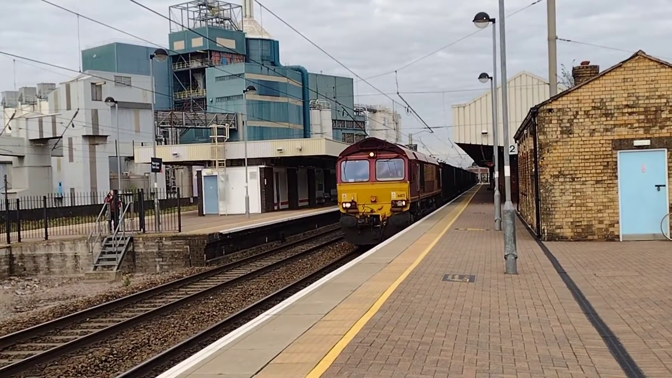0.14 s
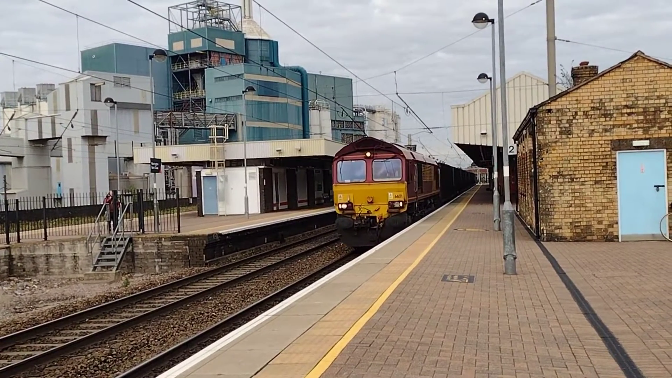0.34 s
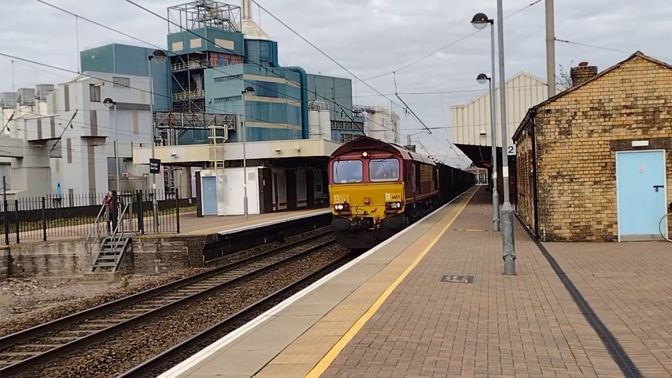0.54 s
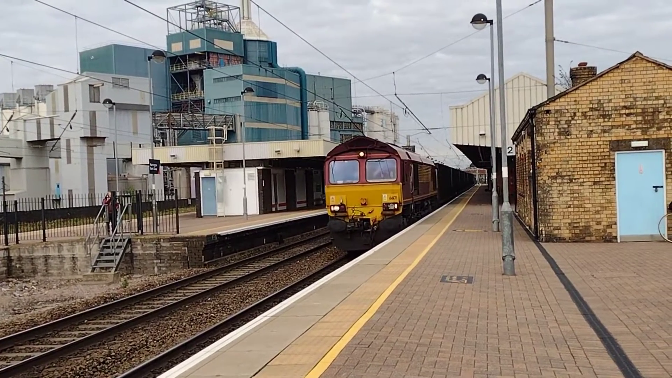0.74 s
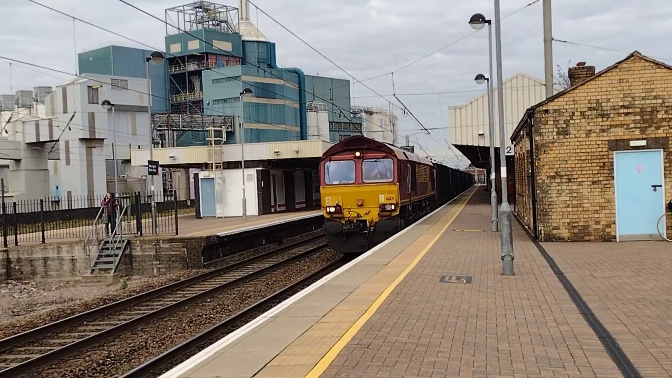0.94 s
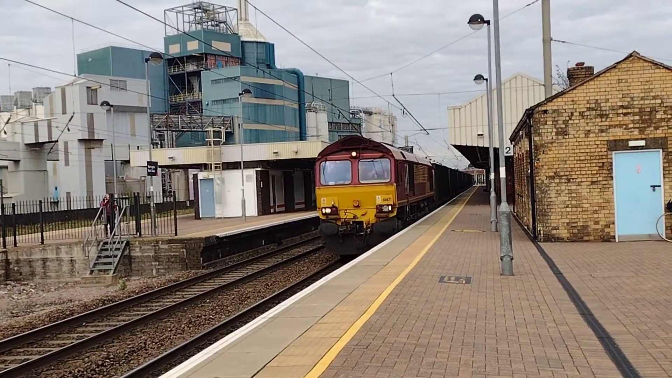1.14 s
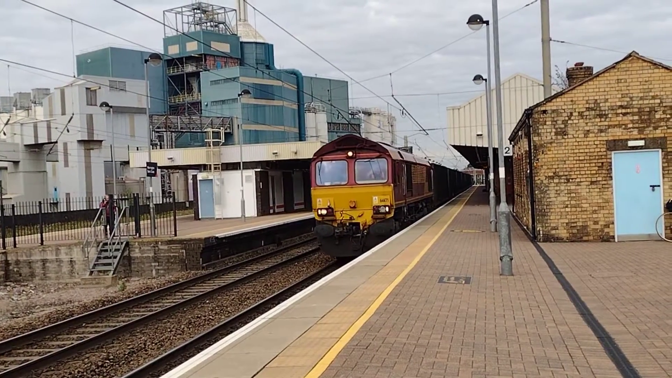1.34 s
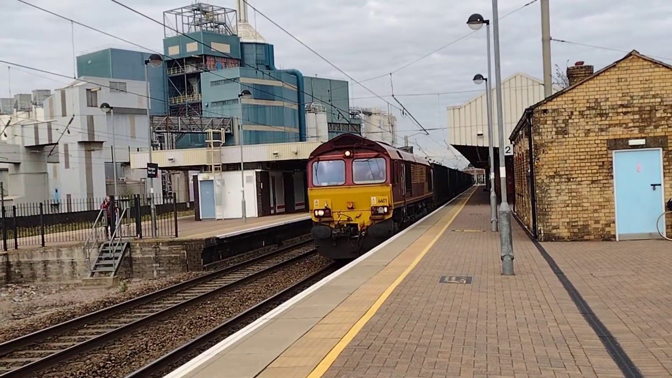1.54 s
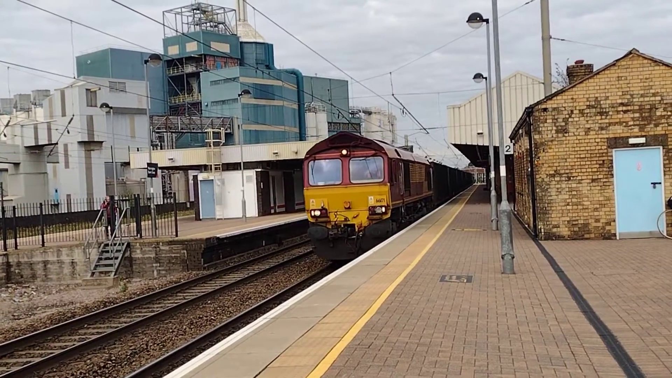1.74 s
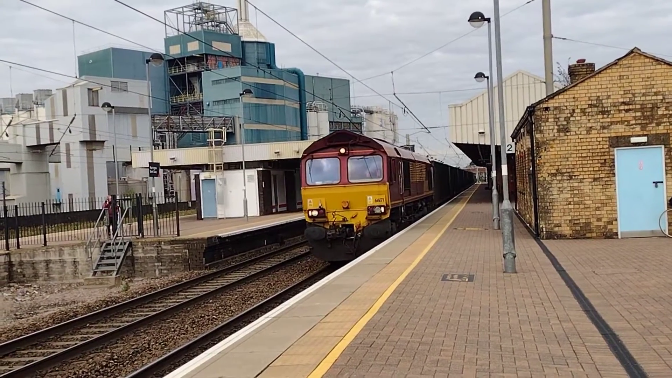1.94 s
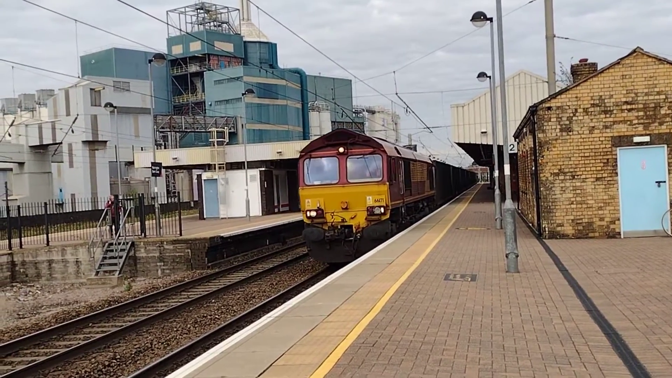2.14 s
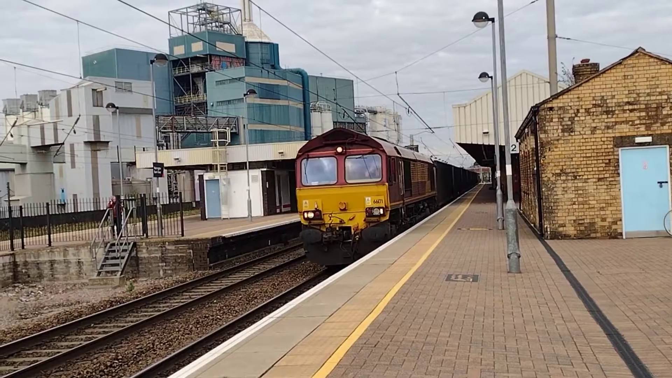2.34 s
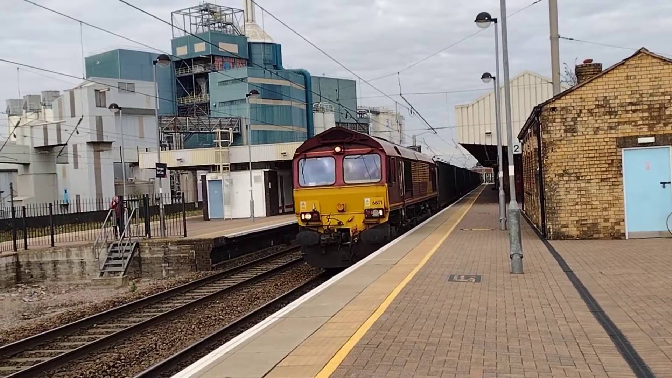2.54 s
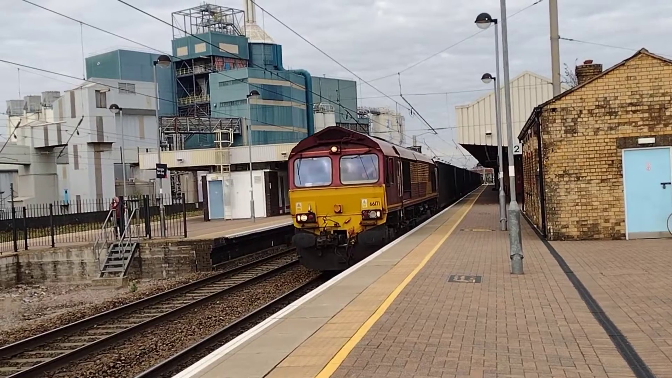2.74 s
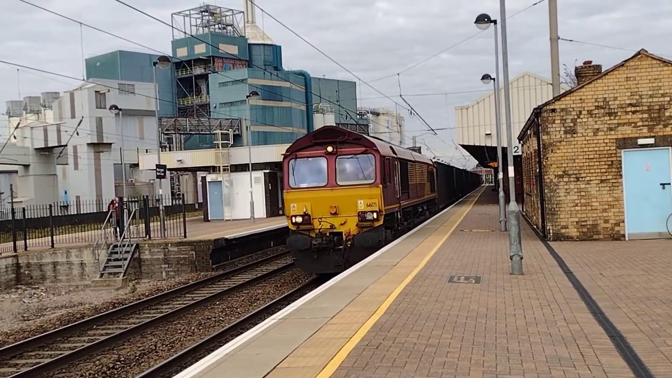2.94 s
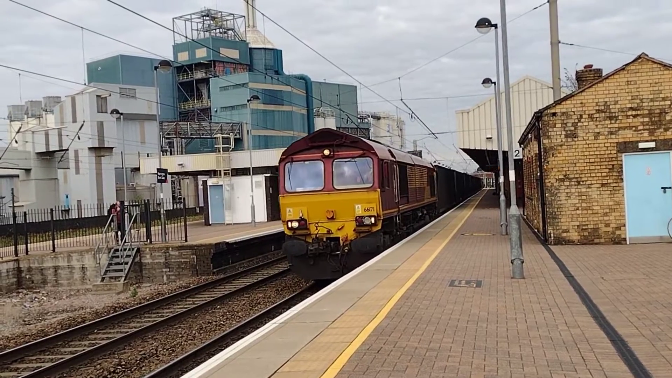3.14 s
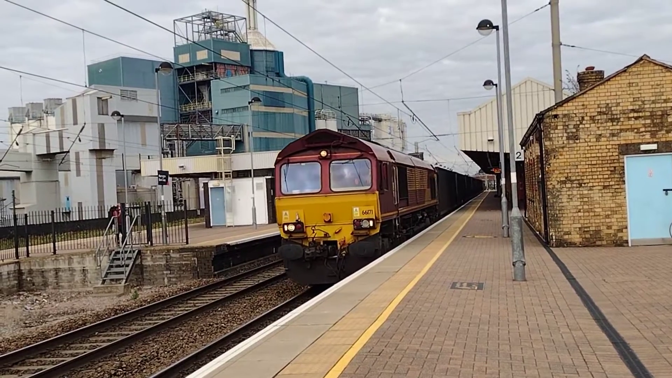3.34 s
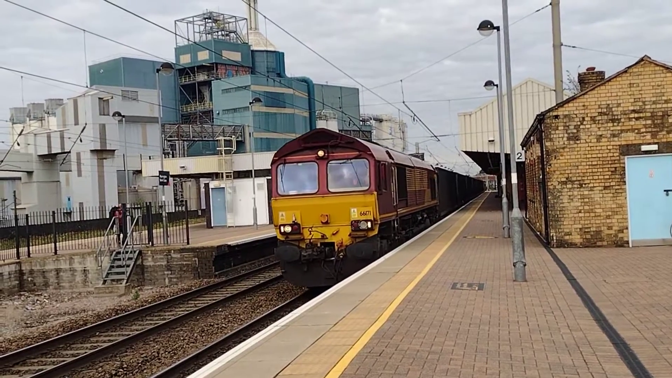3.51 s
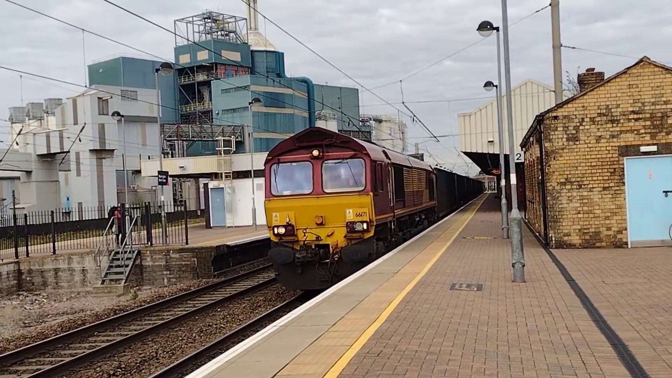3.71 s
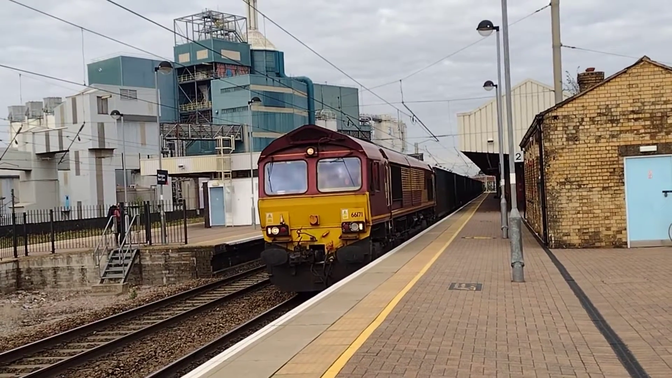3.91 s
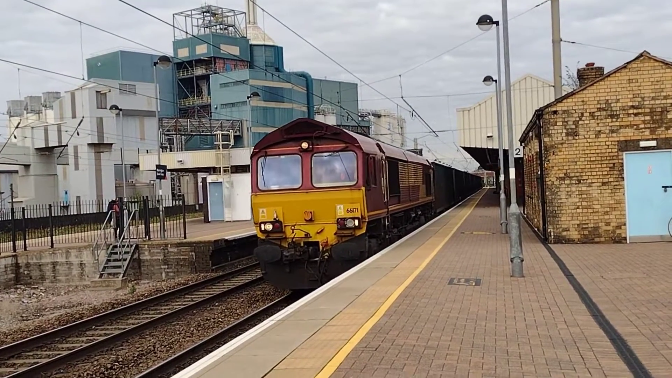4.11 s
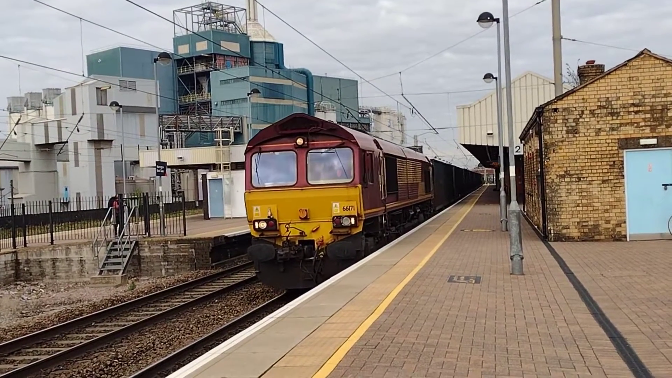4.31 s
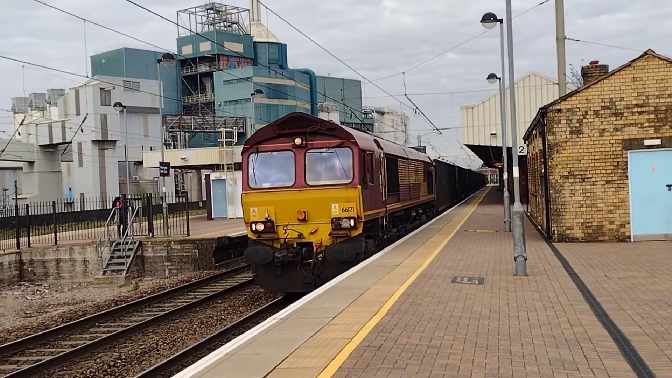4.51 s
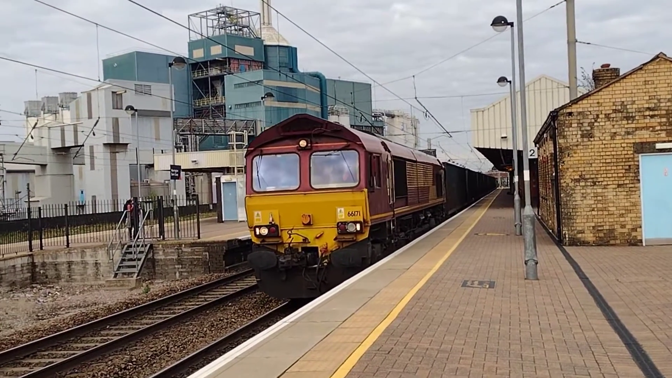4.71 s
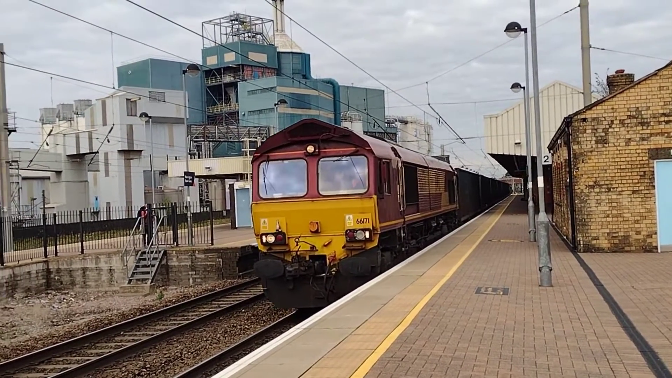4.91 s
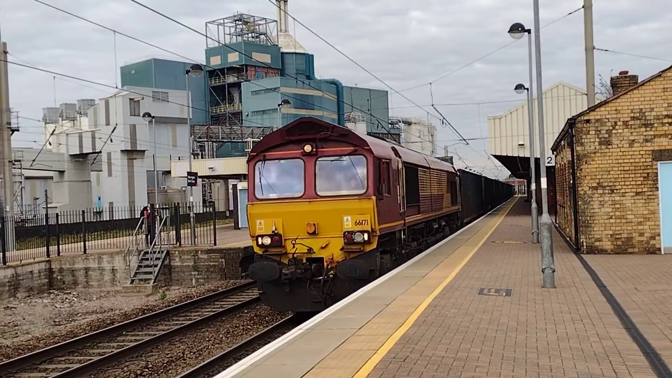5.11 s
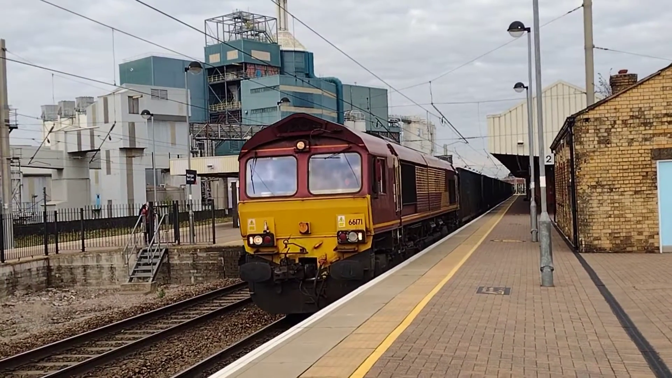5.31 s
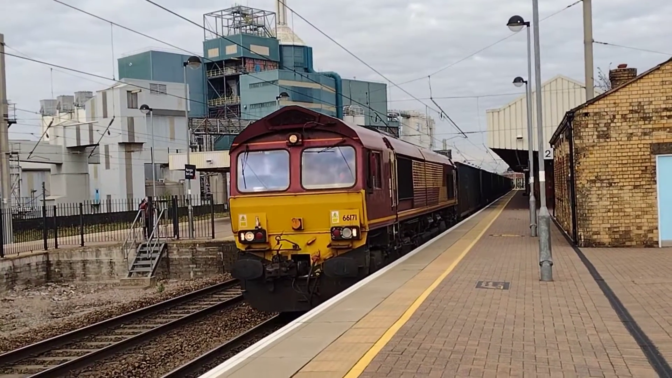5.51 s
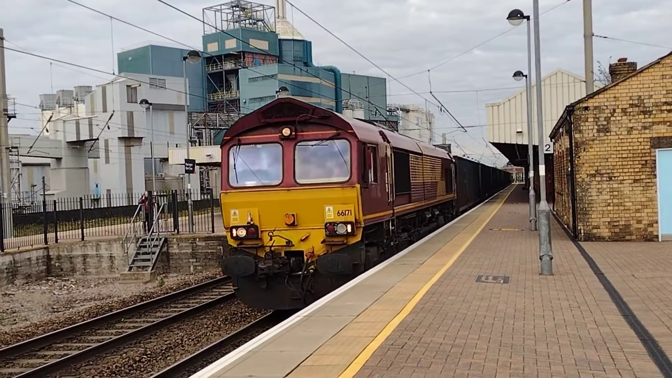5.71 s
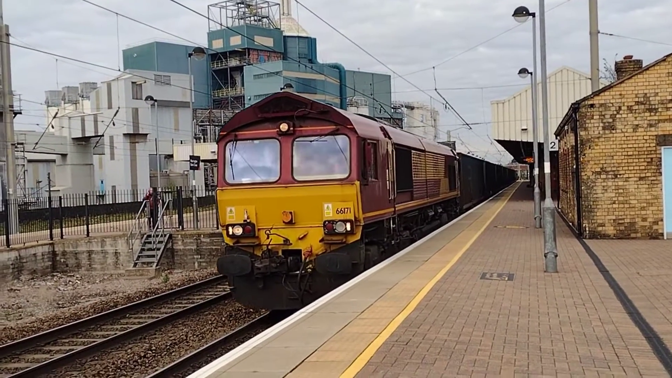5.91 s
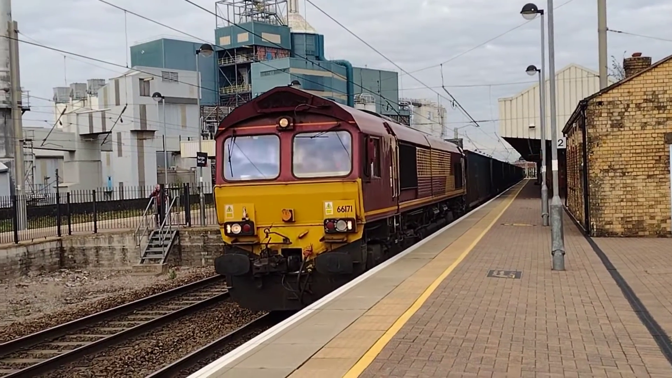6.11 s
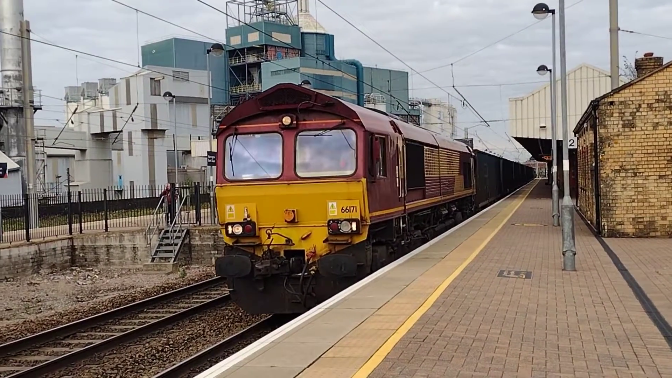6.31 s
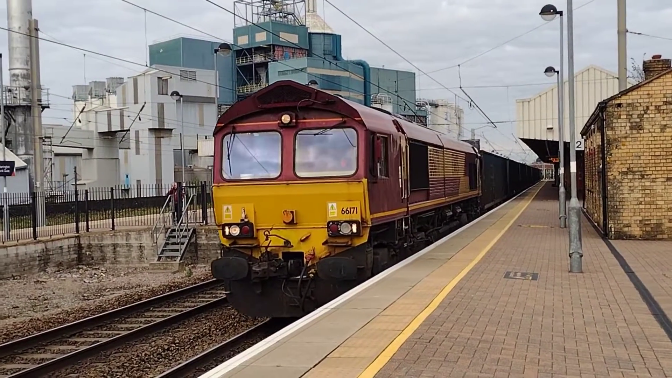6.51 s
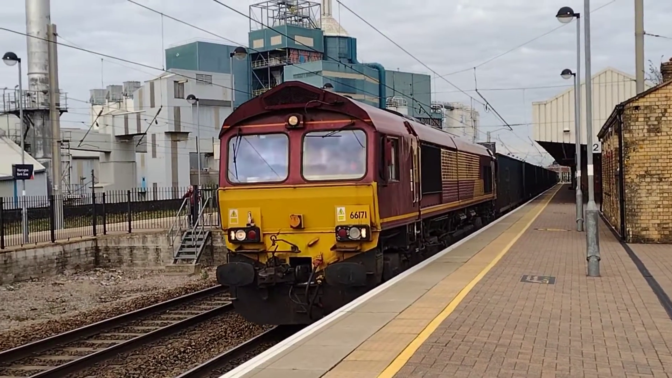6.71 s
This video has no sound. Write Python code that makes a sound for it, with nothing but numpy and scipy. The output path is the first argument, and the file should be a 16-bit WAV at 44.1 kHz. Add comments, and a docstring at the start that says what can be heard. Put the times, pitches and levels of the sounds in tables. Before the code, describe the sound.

A diesel freight locomotive rolls slowly towards a station platform, its low throb and clatter growing steadily louder under a faint whine. The wheels sing with a high, thin squeal at the start. A distant coupling clanks, then air hisses out twice about midway. Near the end the squealing returns, a motor hum cuts in and the roar of the wheels swells as the train nears the microphone.

```python
"""A throbbing exhaust and singing wheels: a diesel freight locomotive rolls slowly towards a platform.
Its twelve-cylinder two-stroke sounds harmonics of the shaft speed and a clatter that recurs every turn.
Gears whine, body panels boom, and stick-slip friction drives the wheels' high modes. A far coupling
clanks and valves let off hissing air; late on an auxiliary motor hums and the wheel roar draws near."""
import sys
import numpy as np
from scipy.fft import rfft, irfft, next_fast_len
from scipy.io import wavfile
from scipy.ndimage import map_coordinates

SR = 44100
rng = np.random.default_rng(int(sys.argv[2]) if len(sys.argv) > 2 else 0)


def dump(signal):
    """Clip the signal to [-1, 1] and save it as 16-bit WAV at the path in sys.argv[1]."""
    limited = np.clip(np.atleast_2d(signal).T, -1, 1)
    pcm = np.round(limited * 32767).astype(np.int16)
    wavfile.write(sys.argv[1], SR, pcm)


N = 297675
SHAFT_HZ = 5.748


def amp(db):
    """Amplitude ratio of a level in decibels."""
    return np.exp(np.asarray(db) * (np.log(10) / 20))


def unit(x):
    """Normalisation to rms 1."""
    return x / np.sqrt(np.mean(x ** 2) + 1e-20)


def clock():
    """The time of every sample in seconds."""
    return np.arange(N) / SR


def wobble(rate_hz):
    """Random modulation: a smooth curve through rate_hz Gaussian knots a second."""
    grid_s = np.linspace(0, N / SR, 2000)
    knots = rng.standard_normal(int(N * rate_hz / SR) + 4)
    return np.interp(clock(), grid_s, map_coordinates(knots, [grid_s * rate_hz]))


def noise():
    """White Gaussian noise."""
    return rng.standard_normal(N)


def filtered(x, response):
    """Linear filtering: the spectrum of x times a frequency response."""
    size = next_fast_len(N + SR // 2)
    return irfft(rfft(x, size) * response(np.fft.rfftfreq(size, 1 / SR)), size)[:N]


def colour(x, points):
    """Spectral shaping through (frequency_hz, level_db) points, with steep skirts, at rms 1."""
    hz, db = np.transpose(points)
    skirts = lambda f: 1 / np.sqrt((1 + (hz[0] / (f + 1)) ** 8) * (1 + (f / hz[-1]) ** 8))
    return unit(filtered(x, lambda f: skirts(f) * amp(np.interp(np.log(f + 1), np.log(hz), db))))


def ring(modes):
    """Resonance under random forcing: (frequency_hz, width_hz, level_db) modes, at rms 1."""
    power = lambda f: sum(amp(db) ** 2 / width / (1 + ((f - hz) / width) ** 2) ** 2
                          for hz, width, db in modes)
    return unit(filtered(noise(), lambda f: np.sqrt(power(f))))


def tone(hz, width_hz, echo_db):
    """Superposition of a direct tone and its smeared reflections from the station, at rms 1."""
    direct = np.sqrt(2) * np.sin(2 * np.pi * hz * clock() + .5 * wobble(5))
    return unit(direct + amp(echo_db) * ring([(hz, width_hz, 0)]))


def envelope(start_s, rise_s, hold_s, t60_s):
    """Linear rise, hold and exponential decay."""
    t = clock() - start_s
    return np.clip(t / rise_s, 0, 1) * amp(-60 * np.maximum(t - rise_s - hold_s, 0) / t60_s)


def approach(db, growth, start_m=46.02, speed_m_per_s=3.6, reference_m=33):
    """Spherical spreading raised to the power growth: a gain that equals db at the reference distance."""
    distance_m = np.maximum(start_m - speed_m_per_s * clock(), 1)
    return amp(db + growth * 20 * np.log10(reference_m / distance_m))


def echo_fade(echo_ratio, dip_s, period_s):
    """Interference: the gain of a tone whose echo slides in and out of step with it."""
    phase = 2 * np.pi * (clock() - dip_s) / period_s
    return np.sqrt(np.abs(1 + echo_ratio ** 2 - 2 * echo_ratio * np.cos(phase)))


def exhaust(turns, drone_growth=.85, panel_growth=1.7):
    """Uneven firings give harmonics of the shaft speed; the strongest beat and fade against an echo."""
    # strongest harmonics and their wall echoes: order, level_db, growth, echo_ratio, dip_s, period_s
    throb = [(6, -55, -0.7, 0.7, 3.2, 4.7), (7, -51, 1, 0.2, 1.6, 7.5), (9, -44, 1.0, 0.32, 1, 6.75)]
    # other exhaust harmonics: order, level_db
    drone = [(3, -63.5), (8, -59.5), (10, -61.5), (12, -63.5), (13, -68), (14, -65), (15, -56), (16, -55),
             (17, -67), (19, -62), (20, -58), (21, -66.5), (23, -59.5), (27, -68), (28, -64.5), (30, -68.5),
             (32, -74), (38, -73), (40, -63), (43, -65), (44, -61), (57, -67.5)]
    # upper harmonics, lifted by ringing body panels: order, level_db
    panels = [(79, -71.5), (83, -67.5), (87, -77.5), (96, -64.5), (106, -67.5), (109, -72), (117, -65.5),
              (122, -70.5)]
    out = np.zeros(N)
    for order, db, growth, echo_ratio, dip_s, period_s in throb:
        level = approach(db + .6 * wobble(5), growth) * echo_fade(echo_ratio, dip_s, period_s)
        out -= level * np.sin(2 * np.pi * order * turns)
    for harmonics, growth in ((drone, drone_growth), (panels, panel_growth)):
        for order, db in harmonics:
            # each harmonic fades in its own way as the echo paths change
            phase = rng.uniform(0, 2 * np.pi) + 0.44 * wobble(2.007)
            level = approach(db + 1.8 * wobble(1.7), growth)
            out += level * np.sin(2 * np.pi * order * turns + phase)
    return out


def clatter(turns, cylinders=12, patterns=4):
    """Cyclic excitation: combustion bursts recur every turn, their pattern shifting as the train moves."""
    # spectrum of the engine block: frequency_hz, level_db
    block = [(90, -6.5), (150, -5.5), (240, -4.5), (320, -10), (390, -12), (435, -17), (480, -14),
             (560, -11), (680, -6.5), (800, -16.5), (1000, -19.5), (1450, -23), (2000, -25), (2400, -32.5)]
    turn_samples = round(SR / SHAFT_HZ)
    place = (turns * turn_samples).astype(int) % turn_samples
    combustion = np.zeros(N)
    for i, pattern in enumerate(rng.standard_normal((patterns, turn_samples))):
        crossfade = np.clip(1 - abs(np.linspace(0, patterns - 1, N) - i), 0, 1)
        combustion += np.sqrt(crossfade) * pattern[place]
    strengths = amp(1.5 * rng.standard_normal(cylinders))
    firing = turns * cylinders
    bursts = strengths[firing.astype(int) % cylinders] * np.exp(-.6 * (firing % 1))
    return colour(combustion * bursts, block)


def panel_boom():
    """Forced resonance: body panels build up a boom, each at one shaft order, and slowly ease."""
    # panel booms: start_s, level_db, rise_s, hold_s, t60_s, order
    booms = [(-.7, -61.5, 2.94, 0.44, 33, 73), (0, -65, .7, .3, 7.2, 96)]
    return sum(amp(db) * envelope(start, rise, hold, t60) * tone(order * SHAFT_HZ, 7.3, echo_db=-5)
               for start, db, rise, hold, t60, order in booms)


def engine(clatter_db=-2, rumble_db=-2.5):
    """A line spectrum of exhaust and panels over broadband clatter and rumble that grow with nearness."""
    # spectrum of the rumble: frequency_hz, level_db
    rumble = [(25, -9), (40, 0), (60, -4.5), (100, -3), (160, -11), (240, -12.5), (340, -11.5), (430, -21),
              (500, -22.5), (660, -10.5), (800, -21.5)]
    turns = SHAFT_HZ * clock() + .0015 * wobble(1.2)
    body = amp(clatter_db) * clatter(turns) + amp(rumble_db) * colour(noise(), rumble)
    return exhaust(turns) + approach(-50.5, growth=.95) * body + panel_boom()


def gears(swing_db=1.5, echo_ratio=.24):
    """Harmonics of the tooth-mesh rate whine, amplitude-modulated once a turn and by shifting echoes."""
    # gear mesh: harmonic, level_db, growth, width_hz, echo_db, dip_s, period_s
    mesh = [(2, -61, 1.5, 14, 1, 2.2, 4.5), (3, -58.5, 2, 18, 0, 2.83, 2.2)]
    mesh_hz = 79.03 * SHAFT_HZ
    swing = amp(swing_db * np.sin(2 * np.pi * SHAFT_HZ * clock()))
    whine = np.zeros(N)
    for harmonic, db, growth, width_hz, echo_db, dip_s, period_s in mesh:
        level = approach(db, growth) * echo_fade(echo_ratio, dip_s, period_s)
        whine += level * tone(harmonic * mesh_hz, width_hz, echo_db)
    return swing * whine


def rolling(clear_s=6.26, spread_s=0.33):
    """Rolling noise, which swells as the leading bogie leaves the acoustic shadow of the platform edge."""
    # spectrum of near wheels and fans: frequency_hz, level_db
    roar_spectrum = [(300, -25), (480, 3), (650, -2.5), (780, -1), (1000, -1), (1200, -1), (1450, -0.5),
                     (1600, -5.5), (1800, -0.5), (2020, -6), (2200, -23), (2700, -33.5), (4000, -45)]
    # spectrum of the sizzling rails: frequency_hz, level_db
    rail_spectrum = [(1200, -15), (2200, -8), (2450, -6), (2700, -14), (3100, 0.5), (3700, 5.5), (4300, 0),
                     (4700, -9), (5600, -23), (6500, -14), (7500, -6.5), (8500, -25.5)]
    # resonances of the running gear: frequency_hz, width_hz, level_db
    bogie_modes = [(1165, 10, -7), (1794, 6.1, -8.5), (2055, 9.7, -1.5), (2910, 10, -11.5), (3216, 15, -8),
                   (3550, 15, -14), (3575, 19, -8), (3730, 25, -14.5), (4060, 17, -8), (4600, 11, -12),
                   (5800, 15, -26.5), (6060, 24, -19.5), (6320, 20, -20.5)]
    # spectrum of the far wagons' even rush: frequency_hz, level_db
    wagon_spectrum = [(900, -2), (1500, -2), (2200, -5.5), (3200, -5.5), (4000, -12.5), (4600, -13),
                      (5600, -14), (7600, -18), (8500, -34.5)]
    # resonances of their wheels: frequency_hz, width_hz, level_db
    wagon_modes = [(2560, 120, 0.5), (3287, 17, 0), (3370, 19, -8.5), (4245, 32, -4), (5390, 24, -2.5),
                   (5830, 23, -11)]
    # the leading bogie's midrange, heard only in the open: frequency_hz, width_hz, level_db
    open_modes = [(1140, 68, -2), (1208, 12, -7), (1310, 25, -7.5)]
    clear = .5 + .5 * np.tanh((clock() - clear_s) / spread_s)
    # parts low on the train gain fastest
    roar_gain = approach(-58.5, growth=2.74) * amp(2 * clear + 0.83 * wobble(14))
    roar = roar_gain * colour(noise(), roar_spectrum)
    steel = amp(-1) * colour(noise(), rail_spectrum) + ring(bogie_modes)
    treads = approach(-71, growth=2.6) * amp(5.5 * clear + 0.91 * wobble(12)) * steel
    wagons = amp(-64) * colour(noise(), wagon_spectrum) + amp(-72.5 + wobble(9.2)) * ring(wagon_modes)
    return roar + treads + wagons + amp(-48.5) * clear * ring(open_modes)


def singing(hz, echo_db, flutter_db=3, flutter_hz=30, smear_hz=60.7):
    """Stick-slip friction drives one wheel mode: a fluttering tone that echoes smear into a band."""
    phase = 2 * np.pi * np.cumsum(hz + 5 * wobble(20)) / SR
    direct = unit(np.sin(phase) * amp(flutter_db * wobble(flutter_hz)))
    echoes = unit(filtered(noise(), lambda f: np.exp(-((f - hz) / smear_hz) ** 2)))
    return unit(direct + amp(echo_db) * echoes)


LOW_MODE_HZ, HIGH_MODE_HZ = 4804, 5176  # the wheels' two squealing modes


def squeal():
    """Self-excited vibration: wheel after wheel swells in one of two high modes, holds and decays."""
    # singing wheels: start_s, level_db, rise_s, hold_s, t60_s, mode_hz, detuning_hz, echo_db
    squeals = [(-.3, -51.5, 0.67, 0.16, 1.1, HIGH_MODE_HZ, 21, 0),
               (-.04, -51.5, .24, 0.96, 5.5, LOW_MODE_HZ, 0, 2),
               (1.1, -70, 0.27, .1, 1.8, HIGH_MODE_HZ, -4, 5.5),
               (2.156, -63.5, 0.38, 0.15, 1, HIGH_MODE_HZ, -26, 12),
               (2.24, -61.5, 0.052, .3, 1, LOW_MODE_HZ, -7.5, -2),
               (2.66, -67, .1, 0.055, .6, HIGH_MODE_HZ, 95, 9),
               (3.12, -62.5, .35, .75, 8, LOW_MODE_HZ, -13.5, -0.5),
               (5.054, -53, 0.067, 0.84, 0.91, LOW_MODE_HZ, 7.5, -3.5),
               (5.75, -59, 0.49, .2, 1, HIGH_MODE_HZ, -23, 6.5),
               (6.098, -52.5, 0.033, 0.25, 2.4, LOW_MODE_HZ, 6.5, -5.5),
               (6.397, -47.5, .13, .3, 1, HIGH_MODE_HZ, -2, -7)]
    return sum(amp(db) * envelope(start, rise, hold, t60) * singing(mode_hz + detuning_hz, echo_db)
               for start, db, rise, hold, t60, mode_hz, detuning_hz, echo_db in squeals)


def flanges():
    """Friction of the flanges keeps a deeper pair of wheel modes ringing, louder when they catch."""
    # brief catches: start_s, level_db
    catches = [(1.469, -59.5), (1.83, -65), (2.865, -65), (3.215, -62)]
    catching = sum(amp(db) * envelope(start, rise_s=.04, hold_s=.04, t60_s=.4) for start, db in catches)
    rubbing = approach(-72, growth=.35)
    return np.hypot(rubbing, catching) * ring([(2966, 20, 0), (2911, 17, -2.5)])


def coupling(start_s=2.15, level_db=-54, rise_s=0.0064, t60_s=1.0):
    """Damped ringing after an impact: a coupling clanks far down the train, blurred by the station."""
    t = np.maximum(clock() - start_s, 0)
    steel = ring([(1300, 190, 2), (2190, 33, -0.5), (2320, 50, -4.5), (3780, 33, -14), (4500, 2700, -7)])
    return amp(level_db - 60 * t / t60_s) * (1 - np.exp(-t / rise_s)) * steel


def air(rush_db=-9):
    """Jet noise: valves blow off air, a hiss over a lower rush that dies away among the buildings."""
    # air releases: start_s, level_db, rise_s, hold_s, t60_s
    releases = [(2.696, -65, 0.053, 0.02, 0.34), (2.914, -70.5, .1, 0.11, 1.8),
                (3.557, -47.5, 0.065, 0.049, 2.7), (3.889, -49, .12, 0.16, 1.18),
                (4.212, -60.5, 0.21, .1, 3.9), (5.45, -67.5, 0.056, 1.8, 2)]
    # spectrum of the hiss: frequency_hz, level_db
    jet_spectrum = [(1500, -10), (1900, 2), (2150, -0.5), (2400, -10), (2850, -15), (3300, -6), (4000, -1),
                    (4500, -4), (5100, -4.5), (5800, -11), (6500, -4.5), (7400, 2), (7900, -6), (8500, -5)]
    power = sum((amp(db) * envelope(start, rise, hold, t60)) ** 2
                for start, db, rise, hold, t60 in releases)
    jet = colour(noise(), jet_spectrum) + amp(rush_db) * ring([(1140, 410, 0)])
    return np.sqrt(power) * amp(0.2 * wobble(25)) * jet


def motor(start_s=5.38, rise_s=0.12, level_db=-54.5, pitch_hz=576.1, swell_db=7.5):
    """An auxiliary motor cuts in with a harmonic series whose fundamental swells once and settles."""
    # partials of the hum: harmonic, level_db
    partials = [(1, 0), (2, -7), (3, -7.5), (4, -19)]
    fundamental, *overtones = [amp(db) * tone(harmonic * pitch_hz, width_hz=3.5, echo_db=-4.5)
                               for harmonic, db in partials]
    swell = np.hypot(1, amp(swell_db) * envelope(start_s=5.78, rise_s=0.23, hold_s=0.097, t60_s=2.4))
    onset = np.clip((clock() - start_s) / rise_s, 0, 1)
    return amp(level_db) * onset * (swell * fundamental + sum(overtones))


def scene():
    """Superposition of all the train's sources at the platform, in one channel."""
    return (engine() + gears() + motor() + rolling() + squeal() + flanges() + air() + coupling())[None]


def record(dry, corner_hz=7800, limit_hz=8500):
    """Low-pass filtering: the microphone's treble rolls off just under its band limit."""
    response = lambda hz: amp(-20 * np.clip((hz - corner_hz) / 650, 0, 2)) * (hz < limit_hz)
    return filtered(dry[0], response)[None]


dry = scene()
out = record(dry)
dump(out)
```